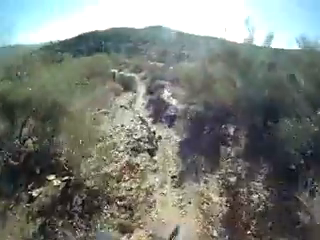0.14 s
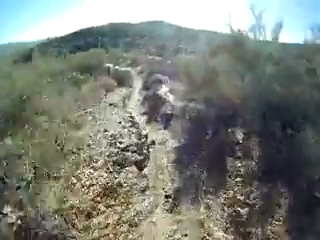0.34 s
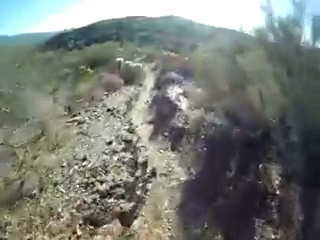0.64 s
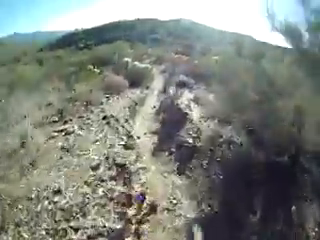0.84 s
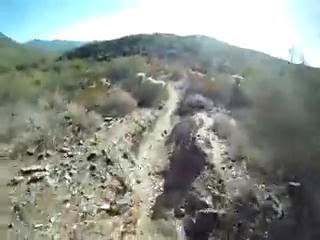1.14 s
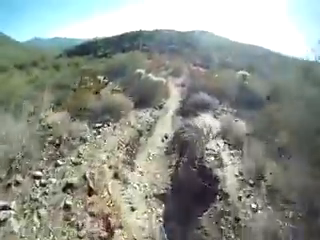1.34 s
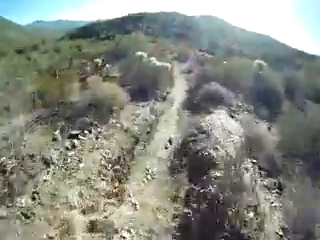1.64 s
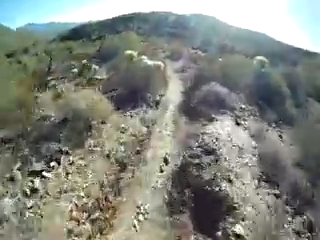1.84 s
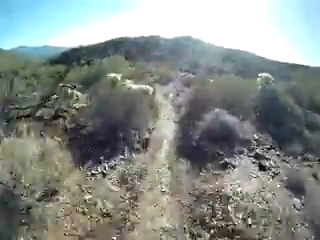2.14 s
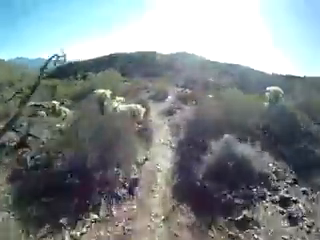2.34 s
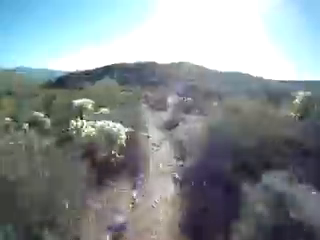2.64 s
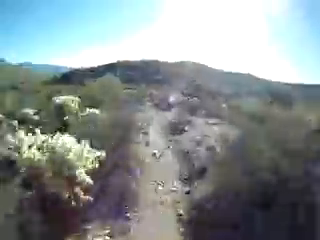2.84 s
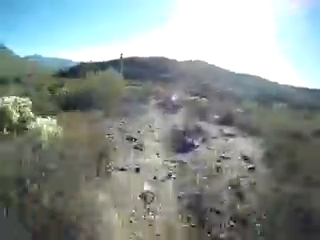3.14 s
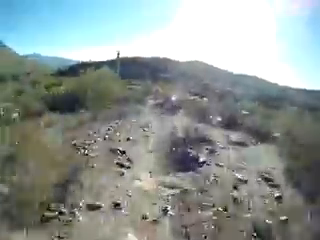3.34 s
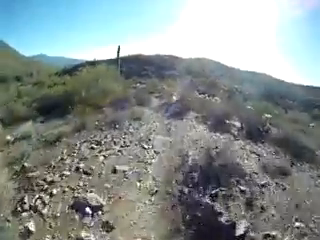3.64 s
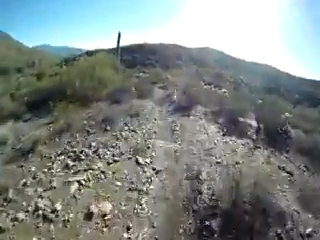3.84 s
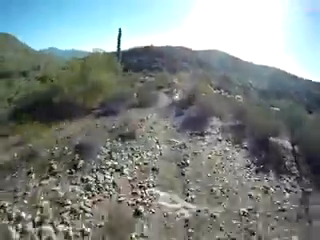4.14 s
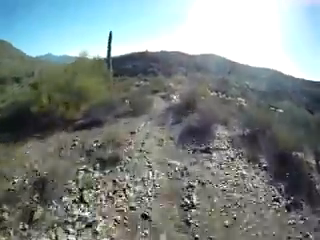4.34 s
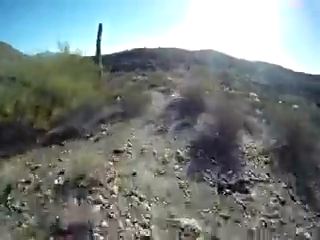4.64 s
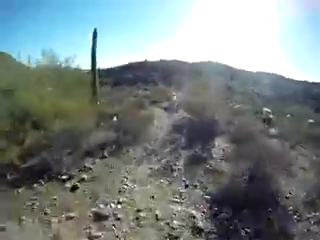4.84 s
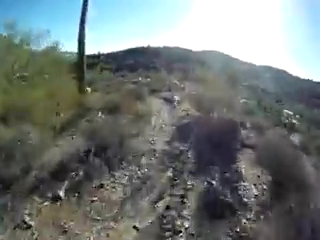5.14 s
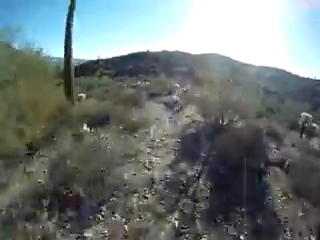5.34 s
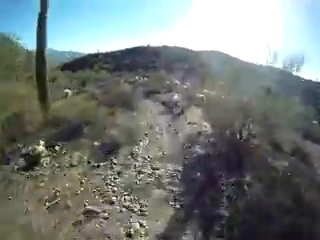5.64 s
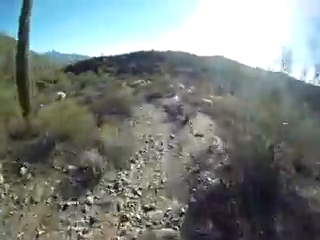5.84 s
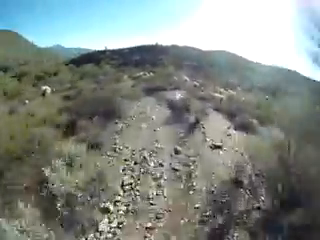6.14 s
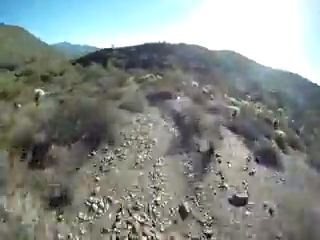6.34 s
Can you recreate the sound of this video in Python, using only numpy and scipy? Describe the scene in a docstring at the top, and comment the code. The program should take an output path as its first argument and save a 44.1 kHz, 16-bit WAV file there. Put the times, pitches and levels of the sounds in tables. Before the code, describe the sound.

A mountain bike rides over a rocky trail, heard close and dry from an onboard camera. Gritty tire crunch, light metallic chain ticking and a low wind rumble run throughout. Hard plastic clacks hit right at the start, about 0.1 and 0.3 seconds in, followed by irregular knocks and chain slaps, with low tire thumps near 0.8 and 1.6 seconds. Separate sharp clacks continue until about 2.6 seconds, then the ground smooths into quieter rolling. Knocks return at around 3.4 seconds. From 4.6 to 5.4 seconds comes a dense run of crunching stones, chain slaps and frame shudder, with the hardest knock near 4.9 seconds. Another rough patch rattles from about 5.8 seconds to the end at 6.5, as the wind buffeting swells. The hard hits carry a slightly distorted, gritty sizzle.

```python
"""Mountain bike on a rocky desert trail

A small action camera rides along. Stones knock through the bike into its plastic case and loose mount,
and the chain slaps the frame. Patches of loose rock bring crunch, rattle, shudder and sway over the
grit of the tyres and a slow buffeting rumble. The camera overloads on hard knocks and holds its
coarse samples, which adds a gritty sizzle."""
import sys
import numpy as np
from scipy import signal
from scipy.io import wavfile
from scipy.ndimage import uniform_filter1d

SR = 44100
rng = np.random.default_rng(int(sys.argv[2]) if len(sys.argv) > 2 else 0)


def master_out(mix):
    """Clip the mix to full scale and print it as 16-bit PCM to the path in sys.argv[1]."""
    frames = np.transpose(np.atleast_2d(mix))
    ceiling = np.clip(frames, -1, 1)
    pcm = np.round(ceiling * 32767).astype(np.int16)
    wavfile.write(sys.argv[1], SR, pcm)


N = 286209
TIME = np.arange(N) / SR
LEAD_S = 0.008  # room for the scrape before each blow


def amp(db):
    """Decibels to gain."""
    return 10 ** (np.asarray(db) / 20)


def unit(x):
    """Scales to an rms of one."""
    return x / np.sqrt(np.mean(x ** 2) + 1e-20)


def smooth(x, span_s):
    """Rounds off fast movement with two running averages."""
    size = int(span_s * SR)
    return uniform_filter1d(uniform_filter1d(x, size), size)


def steady(x, span_s):
    """Evens out the level over the span, keeping finer detail."""
    return x / np.sqrt(abs(smooth(x ** 2, span_s)) + 1e-12)


def add(mix, start_s, sound):
    """Mixes a sound in at its start time."""
    part = mix[max(round(start_s * SR), 0):][:len(sound)]
    part += sound[:len(part)]


def fader(points):
    """Gain riding along a dB curve."""
    return amp(np.interp(TIME, *np.transpose(points)))


def colour(x, spectrum, size=16384):
    """Minimum-phase EQ: clicks keep their sharp fronts."""
    hz, db = np.transpose(spectrum)
    log_hz = np.log(abs(np.fft.fftfreq(size, 1 / SR)) + 1)
    log_gain = np.log(amp(np.interp(log_hz, np.log(hz), db)))
    response = np.fft.ifft(np.exp(np.conj(signal.hilbert(log_gain)))).real
    return signal.fftconvolve(x, response[:size // 2])[:len(x)]


def ring(modes, detune, low_hz, size=2048):
    """Dying modes after one tap; each spot that is struck shifts them a little."""
    hz, db, t60 = np.transpose(modes)[:, :, None]
    t = np.arange(size) / SR
    hz = hz * (1 + detune * rng.standard_normal(hz.shape))
    partials = amp(db) * np.exp(-np.log(1000) * t / t60) * np.sin(2 * np.pi * hz * t)
    low_cut = signal.butter(3, low_hz, "high", fs=SR, output="sos")  # small parts radiate little bass
    return signal.sosfilt(low_cut, partials.sum(0))


def grains(per_s, spread_db):
    """Random clicks, many small and a few large."""
    size = amp(spread_db * np.minimum(rng.exponential(1, N), 4))
    return size * rng.choice([-1, 1], N) * (rng.random(N) < per_s / SR)


def clumps(depth_db):
    """Stones give way in little heaps: a quick random swelling of level."""
    return amp(depth_db * unit(smooth(rng.standard_normal(N), span_s=0.018)))


# Patches of loose rock: (centre time [s], half length [s], crunch level [dB], rattle level [dB])
ROCK_PATCHES = [(0.102, 0.0088, -30.5, -55), (0.231, .013, -30, -39), (0.28, 0.011, -34.5, -38),
                (0.359, 0.011, -32, -34), (0.422, .015, -25.5, -26.5), (0.6, 0.012, -35.5, -34.5),
                (0.837, 0.016, -32.5, -30.5), (0.887, 0.0094, -29, -55), (1.14, 0.0085, -35, -46),
                (1.344, 0.019, -33.5, -33), (1.586, 0.02, -30.5, -32.5), (1.663, .012, -22.5, -18.5),
                (1.001, 0.028, -48.5, -52), (1.882, 0.027, -38, -39), (2.087, 0.0064, -39, -34),
                (2.174, 0.0051, -33.5, -35), (2.376, 0.018, -40, -39), (2.481, 0.0064, -38, -38),
                (2.624, 0.025, -40, -61), (3.412, 0.015, -32.5, -26.5), (3.503, 0.0064, -38, -43),
                (3.602, 0.016, -32, -25.5), (3.896, 0.0096, -34, -57), (4.02, 0.017, -35.5, -37),
                (4.128, 0.0085, -38, -29), (4.211, 0.03, -36.5, -45), (4.451, 0.014, -39, -42),
                (4.657, 0.011, -22, -17), (4.729, 0.013, -26.5, -28), (4.791, 0.0091, -24, -28.5),
                (4.861, 0.01, -25, -27), (4.975, 0.011, -29.5, -26.5), (5.07, 0.024, -29.5, -29.5),
                (5.2, 0.033, -36, -46), (5.356, 0.039, -35, -34), (5.519, 0.0048, -31, -65),
                (5.693, 0.0066, -33, -47), (5.824, 0.0087, -31, -33), (5.903, 0.025, -34, -29),
                (6.041, 0.0089, -25.5, -26.5), (6.092, 0.015, -22.5, -22), (6.16, 0.0088, -25.5, -16),
                (6.246, .016, -28, -52), (6.297, 0.01, -25.5, -24.5), (6.366, 0.0099, -25.5, -27.5),
                (6.445, 0.011, -25, -17)]
CRUNCH, RATTLE = 2, 3  # level columns


def patches(column, width=1.77, shape=2.09):
    """A bell-shaped swell as a tyre crosses each patch; width is in half lengths."""
    coarse = TIME[::32]
    power = np.zeros(len(coarse))
    for patch in ROCK_PATCHES:
        centre_s, half_s = patch[:2]
        distance = abs(coarse - centre_s) / (width * half_s)
        power += amp(patch[column]) ** 2 * np.exp(-2 * distance ** shape)
    return np.interp(TIME, coarse, np.sqrt(power))


# Tyre bed between the rough patches: (time [s], level [dB])
ROLL_LEVEL = [(0.0, -35), (0.27, -46.5), (0.59, -45), (1.21, -47.5), (1.3, -51.5), (1.93, -48), (2.02, -42),
              (3.13, -48.5), (3.5, -42), (4.23, -42), (4.43, -41), (4.66, -53), (4.83, -48.5), (5.3, -43),
              (5.6, -37), (5.87, -48.5), (6.22, -31.5), (6.49, -36)]


def rolling():
    """How hard the rolling tyres work the dirt, as a gain."""
    return fader(ROLL_LEVEL)


# Air pushing on the microphone: (time [s], level [dB])
AIR_LEVEL = [(0, -22.5), (.15, -40), (.35, -30.5), (.65, -40), (1.15, -36), (1.5, -42), (1.68, -36),
             (2.0, -34.5), (2.35, -38), (2.7, -33.5), (3.15, -42), (3.55, -35.5), (4.2, -27.5),
             (4.5, -41.5), (4.75, -27), (5.7, -33.5), (6.25, -15), (6.49, -41)]
# EQ of the sub rumble: (frequency [Hz], gain [dB])
RUMBLE_EQ = [(5, -32.5), (15, 3), (25, 5), (36, 1.5), (52, -6), (80, -32.5), (200, -93)]


def buffet(sway_s=0.02, sway_db=4, air_db=-0.5):
    """Lumpy pressure swings on the microphone, from the air and the camera's sway after each jolt."""
    decay = np.exp(-1 / (sway_s * SR))
    sway = np.sqrt(signal.lfilter([1 - decay], [1, -decay], patches(CRUNCH) ** 2))
    level = np.hypot(amp(air_db) * fader(AIR_LEVEL), amp(sway_db) * sway)
    rumble = colour(rng.standard_normal(N), RUMBLE_EQ)
    return steady(rumble, span_s=0.039) * level


# EQ of the shaking frame and fork: (frequency [Hz], gain [dB])
SHUDDER_EQ = [(25, -24.5), (57, 10), (85, -1), (160, -4.5), (260, -5.5), (400, -14.5), (800, -15.5),
              (2000, -76.5)]


def shudder(growth=0.72, patch_db=-8.5, roll_db=-15.5):
    """Bumps shake the frame and fork; the shudder grows more slowly than the crunch that causes it."""
    bumps = colour(grains(per_s=500, spread_db=4.5), SHUDDER_EQ)
    level = np.hypot(amp(patch_db) * patches(CRUNCH) ** growth, amp(roll_db) * rolling() ** growth)
    return steady(bumps, span_s=0.02) * level


# EQ of stones under rubber: (frequency [Hz], gain [dB])
GRAVEL_EQ = [(150, -42.5), (350, -10), (600, -9.5), (800, 4), (1130, 4.5), (1480, 2.5), (1800, 3),
             (2150, 4.5), (2500, 1), (2950, -10), (3600, -7.5), (4300, -37), (6000, -62)]


def stones(per_s, spread_db, sizes=7):
    """Each size of stone snaps in its own band of pitch."""
    edges_hz = np.geomspace(150, 7000, sizes + 1)
    bands = [signal.butter(2, pair, "band", fs=SR, output="sos") for pair in zip(edges_hz, edges_hz[1:])]
    snaps = sum(signal.sosfilt(band, grains(per_s, spread_db)) for band in bands)
    return colour(snaps, GRAVEL_EQ)


def gravel(crunch_db=4):
    """Stones grind under the tyres: fine grit on smooth ground, coarse crunch on rough patches."""
    grit = steady(stones(per_s=2400, spread_db=1.4), span_s=0.37) * clumps(depth_db=3.5)
    crunch = steady(stones(per_s=600, spread_db=1.0) * clumps(depth_db=3), span_s=0.047)
    return grit * rolling() + amp(crunch_db) * crunch * patches(CRUNCH)


# Bright clink of steel: (frequency [Hz], level [dB], decay to -60 dB [s])
STEEL_MODES = [(3580, 12.5, 0.019), (4350, 3, 0.014), (4770, -7.5, 0.012), (5070, 0.5, 0.031),
               (5240, -49, 0.042)]


def chain(layers=3, growth=1.317, patch_db=-8, roll_db=-2):
    """Links and loose steel parts tick together, hard on rough patches and faintly on smooth dirt."""
    links = np.zeros(N)
    for mode in list(STEEL_MODES) * layers:
        ticks = grains(per_s=280, spread_db=4.0)
        links += signal.oaconvolve(ticks, ring([mode], detune=0.021, low_hz=2720))[:N]
    shaken = np.hypot(amp(patch_db) * patches(RATTLE), amp(roll_db) * rolling() ** growth)
    return steady(links, span_s=0.03) * clumps(depth_db=4.5) * shaken


# Low tyre booms after deep bumps: (time [s], pitch [Hz], level [dB])
TYRE_BOUNCES = [(0.284, 62, -18.5), (0.809, 60.6, -15), (1.628, 48.4, -16), (3.588, 57, -16.5),
                (4.649, 55.2, -12.5), (5.322, 60, -10)]


def bounces(t60=0.18, rise_s=0.0013):
    """The wheel hops on its soft tyre for a few cycles."""
    out, t = np.zeros(N), np.arange(SR // 2) / SR
    envelope = (1 - np.exp(-t / rise_s)) * np.exp(-np.log(1000) * t / t60)
    for start_s, hz, db in TYRE_BOUNCES:
        add(out, start_s, amp(db) * envelope * np.sin(2 * np.pi * hz * t))
    return out


def strike(modes, detune, low_hz, chatter, chatter_s, cutoff_s, scrape_db, scrape_s, late_s=0, size=2048):
    """A short scrape leads into one hard contact and a dying chatter of small ones."""
    t = np.arange(size) / SR - LEAD_S - late_s
    contact = np.where(t < 0, amp(scrape_db) * np.exp(-abs(t) / scrape_s), np.exp(-abs(t) / chatter_s))
    force = chatter * unit(rng.standard_normal(size) * contact) / np.sqrt(size)
    force[np.argmin(abs(t))] += 1  # the hard contact
    sound = signal.fftconvolve(force, ring(modes, detune, low_hz))[:size]
    sound /= 1 + (np.maximum(t, 0) / cutoff_s) ** 6  # the ring is cut off abruptly: a short dry clack
    return sound * np.sqrt(SR / 100 / np.sum(sound ** 2))  # energy of 10 ms at an rms of one


# Plastic case, loose mount and bike frame: (frequency [Hz], level [dB], decay to -60 dB [s])
CASE_MODES = [(906, -2, 0.027), (1138, 7, 0.022), (1390, -12.5, 0.022)]
MOUNT_MODES = [(1944, 6.5, 0.011), (2137, 6, 0.06), (2380, -13, 0.034)]
FRAME_MODES = [(98.3, 14, 0.011), (155, -10.5, 0.013), (301, -10, 0.036), (478, -15, 0.026)]


def blow(case_db, mount_db, steel_db, thud_db):
    """One blow clacks the case, rings the mount just after, clinks steel and thuds through the frame."""
    case = strike(CASE_MODES, detune=0.068, low_hz=370, chatter=0.78, chatter_s=0.0013,
                  cutoff_s=0.005, scrape_db=-15, scrape_s=0.002, late_s=0.00034)
    mount = strike(MOUNT_MODES, detune=0.026, low_hz=1110, chatter=1.0, chatter_s=0.0024,
                   cutoff_s=0.0052, scrape_db=-11, scrape_s=0.002, late_s=0.0006)
    steel = strike(STEEL_MODES, detune=0.051, low_hz=2400, chatter=1.24, chatter_s=0.007,
                   cutoff_s=0.013, scrape_db=-6, scrape_s=0.0023)
    thud = strike(FRAME_MODES, detune=0.16, low_hz=59, chatter=0.5, chatter_s=0.007,
                  cutoff_s=0.039, scrape_db=-12.5, scrape_s=0.0019)
    return amp(case_db) * case + amp(mount_db) * mount + amp(steel_db) * steel + amp(thud_db) * thud


def pebbles(per_s=4.3, level_db=-42.5, spread_db=4.5):
    """Small loose stones flick against the bike at random, weaker where the ground is smooth."""
    out = np.zeros(N)
    roughness = uniform_filter1d(patches(CRUNCH), SR // 2)
    weight = np.sqrt(abs(roughness) / roughness.mean())
    for place, softness in rng.random((int(per_s * N / SR), 2)):
        at = int(place * N)
        db = level_db - spread_db * (2 * softness - 1)
        tap = blow(case_db=db, mount_db=db - 4, steel_db=db - 12, thud_db=db - 10)
        add(out, at / SR - LEAD_S, weight[at] * tap)
    return out


# Chain hits on the frame: (time [s], level [dB])
CHAIN_SLAPS = [(.185, -31), (.3458, -26.5), (.4346, -28), (0.8113, -24), (0.821, -18.5), (1.3655, -23),
               (1.547, -30.5), (1.5823, -22.5), (2.123, -32), (2.1384, -29.5), (2.49, -31.5), (2.654, -21),
               (3.701, -23.5), (3.878, -21), (4.2535, -28.5), (4.4402, -29), (4.715, -18), (4.785, -19),
               (4.8418, -23.5), (4.9705, -23), (5.092, -18), (5.3357, -25), (5.3837, -22), (5.661, -33.5),
               (5.8917, -25.5), (5.9342, -24.5), (6.2336, -22.5)]


def slaps(trim_db=-2.6):
    """The chain hits the frame: steel leads, and a share passes on to the other parts."""
    out = np.zeros(N)
    for hit_s, db in CHAIN_SLAPS:
        add(out, hit_s - LEAD_S, blow(case_db=db - 4, mount_db=db - 2.5, steel_db=db, thud_db=db - 6.5))
    return amp(trim_db) * out


# Stone hits on the wheels: (time [s], case clack [dB], mount ring [dB], frame thud [dB])
STONE_KNOCKS = [(0.1017, -4.5, -7.5, -9.5), (.221, -23, -25, -30), (0.2904, -7.5, -10.5, -15),
                (0.3295, -26, -42, -43), (0.4126, -24, -37, -35), (0.6292, -18, -24, -27),
                (0.8102, -14, -25, -18.5), (.874, -30, -40, -43), (0.8806, -16.5, -17, -41),
                (1.1394, -15, -10, -23), (1.1736, -32, -33, -28.5), (1.252, -13.5, -10.5, -37),
                (1.3238, -24, -24.5, -20.5), (1.3656, -27.5, -26.5, -33.5), (1.5823, -10, -5.5, -39),
                (1.631, -16, -22, -20.5), (1.655, -21.5, -24, -38), (1.852, -28.5, -29.5, -24),
                (1.8828, -26, -48, -31.5), (2.0183, -32.5, -38, -52), (2.124, -10.5, -6.5, -21.5),
                (2.2666, -10.5, -6.5, -56), (2.388, -31, -48, -27), (2.567, -32, -30.5, -32),
                (2.6141, -17, -10.5, -25), (3.3778, -13.5, -9, -31.5), (3.602, -9.5, -12.5, -25.5),
                (3.8306, -11.5, -8, -50), (4.0028, -30, -30, -31), (4.106, -17, -33, -32),
                (4.184, -26, -27.5, -30.5), (4.24, -21, -30, -25.5), (4.409, -22.5, -28.5, -26.5),
                (4.6115, -14, -8, -33), (4.6518, -9.5, -29, -15.5), (4.715, -19, -8.5, -16),
                (4.7859, -12.5, -17, -9.5), (4.8418, -13.5, -20, -19), (4.8522, -20, -20, -22),
                (4.893, -1, -6.5, -12.5), (5.0451, -18, -25, -17.5), (5.0793, -29, -30, -42),
                (5.1397, -18.5, -23, -38), (5.208, -20.5, -32.5, -23.5), (5.326, -21, -27, -19),
                (5.3664, -18, -28, -21), (5.5154, -18.5, -16, -33), (5.8176, -22.5, -20.5, -48),
                (5.882, -16.5, -25, -17.5), (6.037, -13.5, -29, -52), (6.0851, -21, -14.5, -17.5),
                (6.1455, -18, -19.5, -21.5), (6.2166, -14.5, -13.5, -14), (6.2235, -12.5, -10, -39),
                (6.293, -13.5, -16.5, -19.5), (6.3413, -31, -45, -25), (6.436, -9.5, -12, -16.5)]


def knocks(trim_db=-2.27, steel_send_db=-23):
    """Stones strike the wheels; the harder the mount rings, the more the steel clinks with it."""
    out = np.zeros(N)
    for hit_s, case_db, mount_db, thud_db in STONE_KNOCKS:
        add(out, hit_s - LEAD_S, blow(case_db, mount_db, mount_db + steel_send_db, thud_db))
    return amp(trim_db) * out


def scene():
    """Open desert in mono: everything is close and dry."""
    return (knocks() + slaps() + bounces() + gravel() + chain() + shudder() + buffet() + pebbles())[None]


def record(dry, hold_hz=12000, ceiling=0.92, top_hz=15450, oversample=8):
    """The camera samples coarsely, clips and holds each sample, mirroring the mids into the treble."""
    fine_hz = oversample * hold_hz
    fine = signal.resample_poly(dry, fine_hz, SR, axis=1)
    clipped = np.clip(fine[:, ::oversample], -ceiling, ceiling)
    steps = np.repeat(clipped, oversample, axis=1)
    held = signal.resample_poly(steps, SR, fine_hz, axis=1)[:, :N]
    high_cut = signal.firwin(101, top_hz, window=("kaiser", 8), fs=SR)
    return signal.oaconvolve(held, high_cut[None], "same")


dry = scene()
out = record(dry)
master_out(out)
```